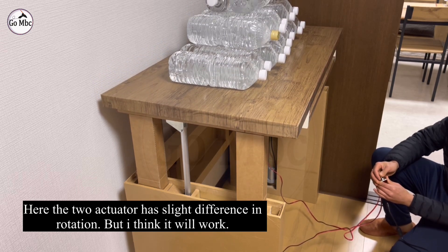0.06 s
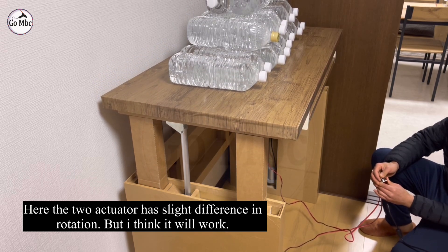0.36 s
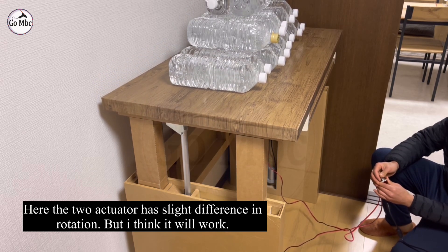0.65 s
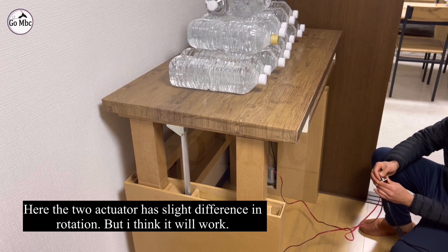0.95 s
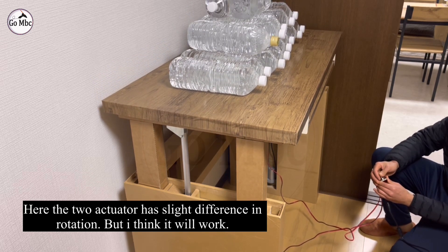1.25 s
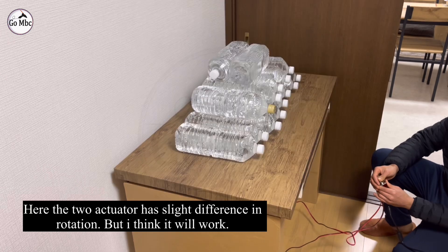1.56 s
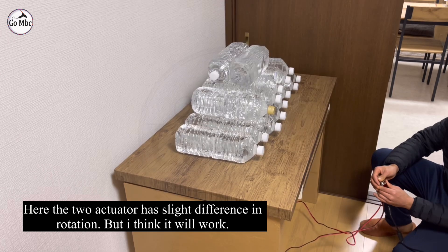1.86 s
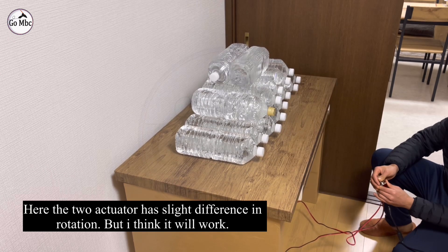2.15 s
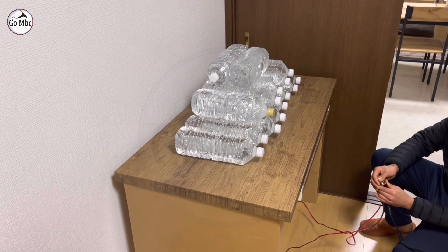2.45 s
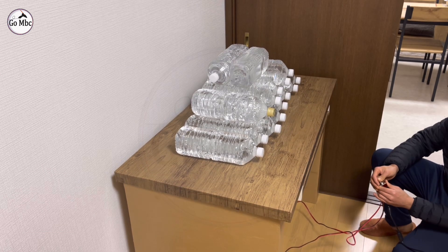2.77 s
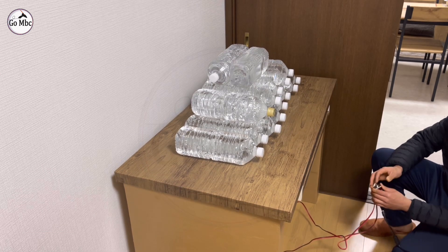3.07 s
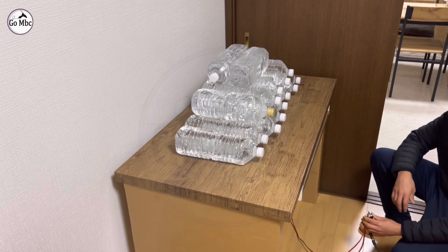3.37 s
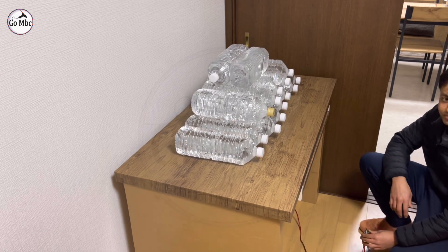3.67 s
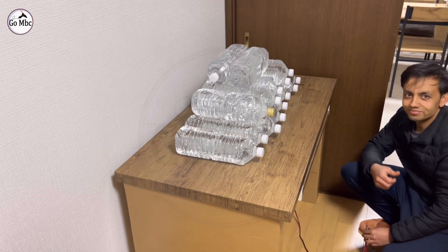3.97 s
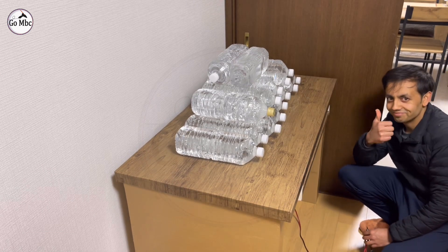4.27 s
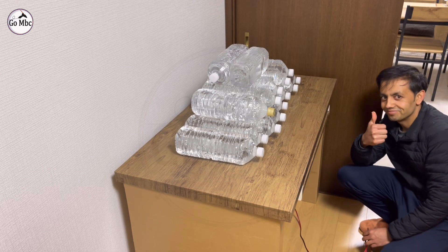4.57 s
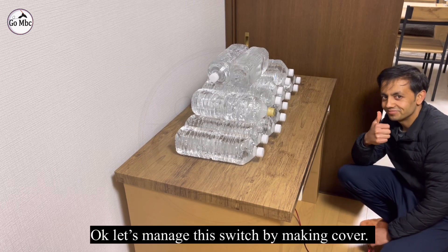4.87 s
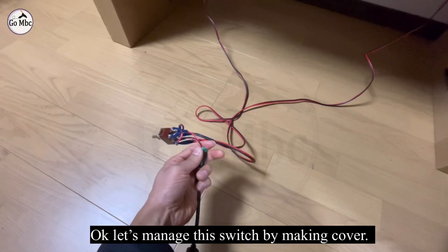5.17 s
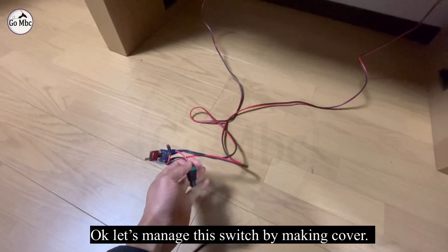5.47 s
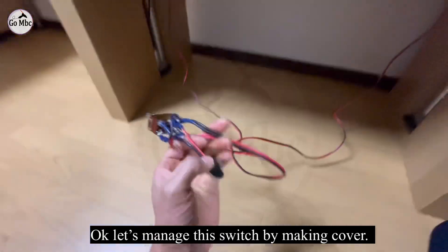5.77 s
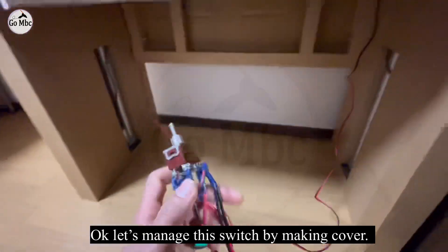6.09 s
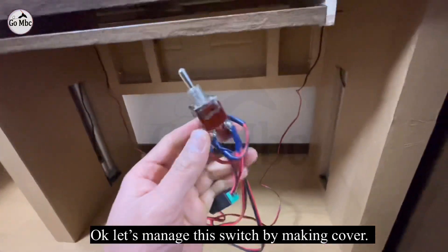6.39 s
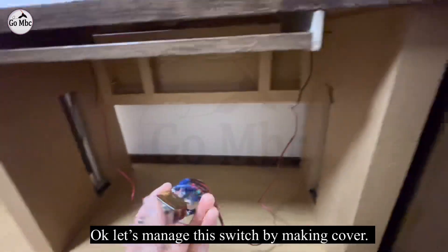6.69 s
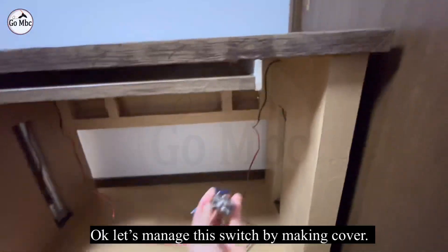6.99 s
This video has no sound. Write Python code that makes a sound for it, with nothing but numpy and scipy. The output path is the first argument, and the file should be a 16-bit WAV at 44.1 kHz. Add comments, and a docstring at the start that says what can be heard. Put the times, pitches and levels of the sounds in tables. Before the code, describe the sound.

In a small room, two geared motors whine and grind at slightly different speeds as they lower a wooden desk, then stop one after the other with a soft thud. Clothes rustle faintly and a wired switch clicks onto the floor. Then, close to the microphone and over a low hum, the toggle switch is handled with faint squeaks, snaps sharply twice and knocks lightly a few times.

```python
"""Two geared motors whine and grind as their screws lower a loaded wooden desk in a small room. They turn
at slightly different speeds, heard from low down and then from above, and stop one after the other.
Clothes rustle and a wired toggle switch is put on the floor. Then, close up and over a low hum, the
switch squeaks in the hand and snaps twice as its contacts strike.
The sound fades out and in briefly three times."""
import sys
import numpy as np
from scipy import signal
from scipy.fft import rfft, irfft, next_fast_len
from scipy.io import wavfile

SR = 44100
rng = np.random.default_rng(int(sys.argv[2]) if len(sys.argv) > 2 else 0)


def master_out(mix):
    """Clip the mix to full scale and print it as 16-bit PCM to the path in sys.argv[1]."""
    frames = np.transpose(np.atleast_2d(mix))
    ceiling = np.clip(frames, -1, 1)
    pcm = np.round(ceiling * 32767).astype(np.int16)
    wavfile.write(sys.argv[1], SR, pcm)


N = 319098

# tone colour of each noise: (frequency [Hz], relative level [dB])
AIR_COLOUR = [(15, -51), (25, -42), (48, -8.5), (190, -6), (249, -14.5), (285, -2.5), (344, -8.5),
              (384, -10), (545, -12.5), (754, -18), (1480, -25), (2550, -36), (3160, -35.5), (3620, -47),
              (16000, -51)]   # the quiet room
RUSH_COLOUR = [(15, -69.5), (25, -48), (44, -28), (97, -12.5), (134, -7), (195, -21.5), (326, -18),
               (373, -17), (624, -24.5), (863, -25), (988, -27), (2220, -33), (4610, -41), (14400, -39.5),
               (16000, -43)]   # the rush close to the desk
SLEEVE_FAR_COLOUR = [(300, -16), (900, 3), (2000, 0), (3100, 4), (5000, -0.5), (9000, -3.5), (12000, -0.5),
                     (15000, 5)]   # cloth across the room
SLEEVE_NEAR_COLOUR = [(300, -8.5), (900, -7.5), (2000, 4.5), (3500, -1.5), (6000, -1.5), (10000, -2.5),
                      (15000, -1.5)]   # cloth close by
CRACK_COLOUR = [(400, -18.5), (1400, 7.5), (2200, 4), (3200, -0.5), (4000, -7.5), (5000, 1), (6500, -6.5),
                (8700, -2.5), (11000, -6), (15500, -11.5)]   # the switch contacts
RUB_COLOUR = [(300, -21), (480, -8), (590, 5.5), (690, -11.5), (800, 4), (1000, -13), (1250, -9.5),
              (2000, -22), (3000, -24), (8000, -49)]   # the switch lever
GRIND_LOW_COLOUR = [(45, -50.5), (100, -8), (260, -7), (450, -1), (620, -1.5), (1000, 2.5), (1280, 1.5),
                    (1600, -11.5), (2300, -7), (3300, -11), (4500, -13), (7300, -21.5), (11000, -17.5),
                    (15500, -16)]   # gears sounding through the desk, from low down
GRIND_ABOVE_COLOUR = [(45, -47), (100, -7), (210, 0), (290, -8), (650, 1), (940, 3.5), (1300, -6),
                      (1700, -10), (2300, -8), (3300, -9), (4400, -13.5), (7300, -19.5), (11000, -18.5),
                      (15500, -17.5)]   # the same from above
# ringing peaks in the grind, with a bright lift near 14.7 kHz: (frequency [Hz], width [Hz], lift [dB])
GRIND_PEAKS = [(2364, 173, 11), (3895, 200, 4.5), (4950, 87, 5.5), (12580, 160, 13.5), (14600, 400, 5.5),
               (14700, 740, 11.5)]
# how alike left and right are: (frequency [Hz], likeness [0 to 1])
AIR_STEREO = [(60, 0.27), (130, 1), (290, .78), (640, .4), (1400, 0.082), (7000, .05), (15000, 0.71)]
MOTOR_STEREO = [(60, 1), (300, 1), (700, 0.81), (1300, 0.28), (2400, 0.26), (5000, 0.27), (15000, .7)]
# the room's echo; a decay time (t60) is the time to fall by 60 dB: (frequency [Hz], decay [s])
ECHO_DECAY = [(150, 0.3), (600, 0.18), (1500, 0.13), (4000, 0.17), (15000, 0.079)]
# sliding sleeves and the rubbing lever: (start [s], length [s], level [dB])
SLEEVE_SLIDES = [(3.1, .18, -82), (3.41, 0.047, -71.5), (3.7, 0.2, -64.5), (4.09, 0.013, -62),
                 (5.16, 0.16, -59), (5.59, 0.064, -62), (5.89, 0.077, -51.5), (6.8, 0.14, -54.5),
                 (7.02, 0.25, -57)]
LEVER_SLIDES = [(5.447, 0.021, -34.5), (5.565, 0.091, -40.5)]
# skin on plastic: (start [s], length [s], level [dB], pitch [Hz])
SKIN_SQUEAKS = [(5.143, 0.43, -63, 1730), (5.77, 0.089, -62.5, 2120), (6.457, 0.19, -70, 2680)]
# thuds of the end stop, falling wire and hand: (time [s], level [dB], decay [s], pitch [Hz])
THUDS = [(2.327, -46.5, 0.36, 153), (4.184, -50, 0.061, 840), (5.030, -32.5, 0.071, 593),
         (6.30, -47, 0.077, 111), (6.335, -49, 0.12, 120), (6.426, -46, 0.083, 200)]
# knocks of switch and wires: (time [s], dull [dB], middle [dB], bright [dB], top [dB], decay [s])
LIGHT_KNOCKS = [(2.913, -92, -59.5, -83, -57.5, 0.12), (3.42, -62.5, -66, -74, -76, 0.069),
                (3.64, -61, -62, -66, -51, 0.082), (3.666, -59, -59, -59, -56, 0.077),
                (4.1375, -33.5, -29, -39.5, -25.5, 0.013), (5.031, -30, -26.5, -29.5, -43, 0.022),
                (5.245, -49, -44.5, -57, -66, 0.044), (5.2864, -58.5, -69, -42.5, -45, 0.03),
                (5.288, -55, -55, -33, -29, 0.068), (6.433, -45.5, -57, -47, -46, 0.011),
                (6.469, -69.5, -57, -61, -49, .02), (6.88, -48.5, -50.5, -47, -61, 0.13)]
# their dull, middle, bright and top ranges: (low edge [Hz], high edge before band() caps it [Hz])
KNOCK_BANDS = [(1000, 1610), (1700, 3750), (4500, 14200), (12000, 28000)]
# sharp hits within the two snaps, including a quick echo of the first:
# (time [s], knock [dB], crack [dB], crack decay [s])
SNAP_HITS = [(5.435, -8, -27.5, 0.019), (5.4373, -31.5, -28, 0.066), (5.459, -22, -45, 0.037),
             (5.6318, -21, -22.5, 0.043), (5.6399, -15.5, -21.5, 0.022), (5.6417, -18, -12, 0.0094),
             (5.6438, -32, -25, 0.14)]
# the notes that ring in switch and room after each snap: (pitch [Hz], relative level [dB], decay [s])
SNAP_NOTES = [(270.4, -7.5, 0.013), (410, -12, 0.032), (577, 0, 0.026), (835, -6, 0.049),
              (1250, -4, 0.0059), (1510, -6, 0.026), (1810, -2, 0.015), (2370, -25, 0.0068),
              (3200, -26, 0.017)]
# hum and rush sink at each snap: (time [s], added depth [dB])
HUM_DIPS = [(5.44, 7), (5.639, 7)]
# rotor and gear tones, relative levels: (pitch [times rotor speed], from low down [dB], from above [dB])
FAST_GEAR_TONES = [(2, -75, -56), (2.21, -75, -59), (6, -63, -58), (8.86, -58, -52), (11.4, -70, -46),
                   (12, -58, -61), (18, -63, -69), (23, -55, -55), (24, -51, -54), (25, -57, -58),
                   (26, -61, -67), (27, -67, -61), (29, -70, -59), (30, -59, -61), (34, -65, -71),
                   (35, -58, -61), (36, -49.5, -50.5), (37, -58, -58), (38, -68, -68), (47, -61, -69),
                   (48, -55, -62), (49, -64, -64), (121, -73, -76), (132, -60, -60), (133, -68, -73),
                   (143, -64, -63), (144, -54, -55), (145, -67, -69), (146, -76, -77), (148, -67, -78)]
SLOW_GEAR_TONES = [(3.95, -52.5, -65), (4.88, -58, -73), (6, -55.5, -61), (6.62, -71, -56),
                   (8.83, -55, -51), (9.4, -58, -52.5), (11, -60, -62), (12, -56, -57), (14, -60, -78),
                   (23, -66, -64), (24, -47, -52.5), (25, -69, -61), (32, -60, -75), (36, -62, -68),
                   (48, -67, -67), (49, -70, -77)]
# each rotor's run, heard from low down and then from above:
# (start [s], speed [turns/s], speed-up [turns/s per s], easiest moment [s], speed swing [share])
FAST_RUN = [(0, 104.42, .2, .16, .004), (1.51, 105.2, .64, 1.622, .0068)]
SLOW_RUN = [(0, 97.9, .49, .97, .0035), (1.51, 99.6, .9, 1.68, .004)]
# fades of the whole sound: (quietest moment [s], fade-out [s], fade-in [s])
BRIEF_FADES = [(1.51, 0.13, 0.14), (4.995, 0.13, 0.16), (6.645, 0.15, 0.135)]

ABOVE_FROM_S, CLOSE_FROM_S = 1.51, 5.0   # heard from above the desk, then close up


def from_db(db):
    """Turn decibels into a number to multiply by."""
    return 10 ** (np.asarray(db) / 20)


def rms_one(x):
    """Scale a signal so that its average strength (rms) is 1."""
    return x / np.sqrt(np.mean(x ** 2) + 1e-20)


def clock():
    """The time of every sample, in seconds."""
    return np.arange(N) / SR


def at_hz(points, hz):
    """Read between a table's rows, giving each octave equal room."""
    points = np.array(points)
    return np.interp(np.log(np.maximum(hz, 1)), np.log(points[:, 0]), points[:, 1])


def drift(rate, size=N):
    """A smooth random wobble of strength 1 that changes about rate times a second."""
    r = np.exp(-80 * np.pi * rate / SR)
    slow = signal.lfilter([1], [1, -2 * r, r * r], rng.standard_normal(size // 40 + 2002))[2000:]
    return np.interp(np.arange(size) / 40, np.arange(len(slow)), rms_one(slow))


def coloured(pair, colour, likeness, peaks=()):
    """Turn two signals into stereo of strength 1 with a tone colour, peaks and left-right likeness."""
    size = next_fast_len(N)
    hz = np.arange(size // 2 + 1) * SR / size
    peaks_db = sum(lift / (1 + (2 * (hz - centre) / width) ** 2) for centre, width, lift in peaks)
    alike = np.clip(at_hz(likeness, hz), -1, 1)
    mid, side = rfft(pair, size) * from_db(at_hz(colour, hz) + peaks_db) * hz / np.hypot(hz, 20)
    stereo = np.sqrt(1 + alike) * mid + np.sqrt(1 - alike) * side * [[1], [-1]]
    return rms_one(irfft(stereo, size)[:, :N])


def noise(colour, likeness=AIR_STEREO):
    """Steady stereo noise of strength 1."""
    return coloured(rng.standard_normal((2, N)), colour, likeness)


def band(x, low_hz, high_hz):
    """Keep the sound between two frequencies."""
    edges = [low_hz, min(high_hz, .45 * SR)]
    return signal.sosfilt(signal.butter(2, edges, "band", fs=SR, output="sos"), x)


def blows(times, dbs, t60s):
    """The loudness curve of sudden blows that each die away."""
    out, age = np.zeros(N), np.arange(SR // 4) / SR
    for s, db, t60 in zip(times, dbs, t60s):
        part = out[round(s * SR):][:len(age)]
        part += from_db(db - 60 * age / t60)[:len(part)]
    return out


def strokes(rows, rise_s, fall_s):
    """The loudness curve of slides: each swells 20 dB per rise_s, holds, then drops 20 dB per fall_s."""
    t = clock()
    levels = [db - 20 * np.maximum(np.maximum((start - t) / rise_s, (t - start - length) / fall_s), 0)
              for start, length, db in rows]
    return from_db(np.maximum(np.max(levels, axis=0), -200))


def ring(times, dbs, hz, t60):
    """Each blow starts a pure note that dies away."""
    clicks = np.zeros(N)
    clicks[np.round(np.asarray(times) * SR).astype(int)] = from_db(dbs)
    r, w = np.exp(-np.log(1000) / (t60 * SR)), 2 * np.pi * hz / SR
    return signal.lfilter([0, np.sin(w)], [1, -2 * r * np.cos(w), r * r], clicks + 1e-18)


def panned(x, left_db):
    """Make the left side louder than the right by left_db."""
    return x * from_db([[left_db / 2], [-left_db / 2]])


def room(x, echo_db):
    """Add the dense echoes of a small room; the treble dies first."""
    age, edges = np.arange(SR // 2) / SR, np.geomspace(120, 16000, 8)
    tail = sum(band(rng.standard_normal((2, len(age))), low, high)
               * from_db(-60 * age / at_hz(ECHO_DECAY, np.sqrt(low * high)))
               for low, high in zip(edges, edges[1:]))
    tail *= np.clip(age / 0.0024, 0, 1)
    tail /= np.sqrt(np.sum(tail ** 2) / 2)
    return x + from_db(echo_db) * signal.fftconvolve(x, tail, axes=1)[:, :N]


def background(hum_hz=136.9, recovery_db_per_s=5, restored_s=6.64):
    """Faint room air; close to the desk, a wavering hum and a louder rush that dip after the snaps."""
    t = clock()
    sunk_db = sum(depth_db * np.clip((t - s) / 0.032, 0, 1) for s, depth_db in HUM_DIPS)
    sunk_db -= recovery_db_per_s * np.maximum(t - HUM_DIPS[0][0], 0)
    dip = from_db(-np.maximum(sunk_db, 0) * (t < restored_s))
    hum = np.sqrt(2) * np.sin(2 * np.pi * hum_hz * t + 0.11 * drift(21)) * from_db(-44 - 2.1 * drift(12))
    rush = from_db(-46) * noise(RUSH_COLOUR)
    close = panned(hum, left_db=1.6) + panned(rush, left_db=1.0)
    return np.where(t > CLOSE_FROM_S, dip * close, from_db(-63) * noise(AIR_COLOUR))


def sleeves(crackles_per_s=60, crackle_db=-7):
    """Cloth slides with a fine, uneven hiss; close by, the wires crackle against it."""
    clicks = (rng.random(N) < crackles_per_s / SR) * np.minimum(rng.exponential(1, N), 3)
    grain = rng.standard_normal(SR // 400) * np.linspace(1, 0, SR // 400) ** 2
    crackles = from_db(crackle_db) * rms_one(signal.fftconvolve(clicks, grain)[:N])
    near = coloured(rng.standard_normal((2, N)) + crackles * [[1], [.5]], SLEEVE_NEAR_COLOUR, AIR_STEREO)
    hiss = np.where(clock() > CLOSE_FROM_S, near, noise(SLEEVE_FAR_COLOUR, MOTOR_STEREO))
    return strokes(SLEEVE_SLIDES, rise_s=.16, fall_s=.18) * from_db(drift(50)) * hiss


def squeaks(width_ratio=1.11):
    """Skin slips over the plastic and makes it rasp faintly around one pitch."""
    out = np.zeros((2, N))
    for start, length, db, hz in SKIN_SQUEAKS:
        friction = rng.standard_normal(N) + rng.standard_normal((2, N))
        rasp = rms_one(band(friction, hz / width_ratio, hz * width_ratio))
        out += strokes([(start, length, db)], rise_s=.08, fall_s=.1) * rasp
    return out


def soft_bumps():
    """The end stop, the falling wire and the hand make dull thuds, alike on both sides."""
    white, out = rng.standard_normal(N), np.zeros(N)
    for s, db, t60, hz in THUDS:
        rumble = rms_one(band(white, hz / 2, hz * 2))
        out += band(blows([s], [db], [t60]) * rumble, hz / 2, hz * 2)
    return out


def light_knocks(low_cut_hz=850):
    """Switch and wires knock in short bursts of noise; such small parts give off no bass."""
    times, *levels, t60s = np.transpose(LIGHT_KNOCKS)
    bursts = np.zeros((2, N))
    for dbs, (low, high) in zip(levels, KNOCK_BANDS):
        white = rng.standard_normal(N) + 2.1 * rng.standard_normal((2, N))
        bursts += blows(times, dbs, t60s) * rms_one(band(white, low, high))
    bursts = signal.sosfilt(signal.butter(4, low_cut_hz, "high", fs=SR, output="sos"), bursts)
    return room(panned(bursts, left_db=1.5), echo_db=-15.5)


def switch(late_cycles=0.73, right_delay_s=.00027):
    """The lever rubs, each snap cracks and sets switch and room ringing, and the spring pings once."""
    times, knock_db, crack_db, t60s = np.transpose(SNAP_HITS)
    # low notes travel more slowly and start later, so each knock sweeps quickly downwards
    notes = sum(ring(times + late_cycles / hz, knock_db + db + rng.normal(0, 1, len(times)), hz, t60)
                for hz, db, t60 in SNAP_NOTES)
    notes = band(notes, low_hz=220, high_hz=9000)
    crack = blows(times, crack_db, t60s) * noise(CRACK_COLOUR, likeness=[(300, 0.3), (15000, 0.25)])
    ping = ring(times=[5.646], dbs=[-19.5], hz=8700, t60=.02)
    left, right = panned(notes, left_db=5.0) + panned(crack, left_db=3.0) + panned(ping, left_db=16)
    direct = np.array([left, np.interp(clock() - right_delay_s, clock(), right)])
    snaps = room(direct, echo_db=-17)
    return snaps + strokes(LEVER_SLIDES, rise_s=.03, fall_s=.069) * noise(RUB_COLOUR, MOTOR_STEREO)


def rotor_speed(run, turns_per_screw_turn=20.4):
    """The rotor slowly speeds up; the screw runs easy (ease 1) and hard (-1) once per screw turn."""
    t, speed, ease = clock(), np.zeros(N), np.zeros(N)
    for start_s, turns_per_s, speed_up, easiest_s, swing in run:
        screw_turns = (t - easiest_s) * turns_per_s / turns_per_screw_turn
        ease = np.where(t >= start_s, np.cos(2 * np.pi * screw_turns), ease)
        rising_speed = turns_per_s + speed_up * (t - start_s)
        speed = np.where(t >= start_s, rising_speed * (1 + swing * ease), speed)
    return speed, ease


def gear_whine(tones, turns, ease, running, whine_db, brush_db=5.5, flutter_db=1.8):
    """Tones that follow the rotor while it is running; the highest are the brushes squealing."""
    above = clock()[:running] > ABOVE_FROM_S
    whine = np.zeros((2, N))
    for multiple, db_low, db_above in tones:
        # high tones reach the two sides out of step
        apart = min(multiple / 22, 1) * .5 * rng.choice([-1, 1])
        wander, flutter = drift(6.1, size=3 * SR)[:running], drift(19.0, size=3 * SR)[:running]
        angle = 2 * np.pi * (multiple * turns[:running] + rng.random()) + 0.38 * wander
        # uneven meshing makes each tone flutter; high ones swell 1 dB when the screw runs easy
        waver_db = flutter_db * flutter + min(multiple / 36, 1) * ease[:running]
        level_db = np.where(above, db_above, db_low) + whine_db + brush_db * (multiple > 100) + waver_db
        whine[:, :running] += np.sqrt(2) * from_db(level_db) * np.sin(angle + [[apart], [-apart]])
    return whine


def gear_grind(turns, braking, low_db, above_db, buzz, chop, chops_per_turn=6):
    """The same surface bumps buzz past on every turn, mixed with fresh friction; the teeth chop both."""
    places = np.linspace(0, 1, 400, endpoint=False)
    bumps = np.array([np.interp(turns, places, side, period=1) for side in rng.standard_normal((2, 400))])
    friction = buzz * rms_one(bumps * braking) + rng.standard_normal((2, N))
    teeth = 1 + chop * np.cos(2 * np.pi * chops_per_turn * turns) + 0.094 * np.cos(2 * np.pi * turns)
    rub = friction * teeth * from_db(drift(28)) * (braking > 0)
    above = from_db(above_db) * coloured(rub, GRIND_ABOVE_COLOUR, MOTOR_STEREO, GRIND_PEAKS)
    low = from_db(low_db) * coloured(rub, GRIND_LOW_COLOUR, MOTOR_STEREO, GRIND_PEAKS)
    return np.where(clock() > ABOVE_FROM_S, above, low)


def motor(run, tones, stop_s, whine_db, swell_db_per_s, jitter, coast_s=.12, **grind_settings):
    """A geared motor runs, then coasts to rest: the whine dies first, the gears grind a little longer."""
    since_stop = np.maximum(clock() - stop_s, 0)
    coasted = since_stop / coast_s
    braking = 1 - np.minimum(coasted, 1) ** 2
    speed, ease = rotor_speed(run)
    turns = np.cumsum(speed * braking * (1 + jitter * drift(35))) / SR
    whine = gear_whine(tones, turns, ease, np.count_nonzero(braking), whine_db)
    grind = gear_grind(turns, braking, **grind_settings)
    # heard from low down, the level creeps up as the desk sinks
    swell_db = swell_db_per_s * np.minimum(clock() - ABOVE_FROM_S, 0)
    coast_db = -49 * np.minimum(coasted, 2) ** 2
    return from_db(swell_db + coast_db) * (whine * from_db(-200 * since_stop) + grind)


def desk_motors():
    """Two motors lower the desk; the faster one reaches its end stop first."""
    fast = motor(FAST_RUN, FAST_GEAR_TONES, stop_s=2.348, whine_db=-1.36, swell_db_per_s=0.65,
                 jitter=0.0013, low_db=-47, above_db=-47.5, buzz=0.31, chop=0.16)
    slow = motor(SLOW_RUN, SLOW_GEAR_TONES, stop_s=2.45, whine_db=-0.03, swell_db_per_s=0.2,
                 jitter=0.00196, low_db=-48, above_db=-51, buzz=0.16, chop=0.3)
    left, right = fast + slow
    # the treble is stronger on the left, beside the wall
    return np.array([left + 0.42 * band(left, low_hz=2240, high_hz=9900), 0.88 * right])


def scene():
    """Add all the sounds together."""
    return desk_motors() + background() + sleeves() + squeaks() + light_knocks() + soft_bumps() + switch()


def record(dry, low_cut_hz=42, high_cut_hz=15900, gap_s=0.022, fade_power=1.17):
    """The microphone drops the deepest bass; the sound fades three times and loses its top treble."""
    t = clock()
    sound = signal.sosfilt(signal.butter(3, low_cut_hz, "high", fs=SR, output="sos"), dry)
    for silent_s, out_s, in_s in BRIEF_FADES:
        fade_out = (silent_s - gap_s / 2 - t) / out_s
        fade_in = (t - silent_s - gap_s / 2) / in_s
        sound *= np.clip(np.maximum(fade_out, fade_in), .001, 1) ** fade_power
    return signal.sosfilt(signal.ellip(10, .1, 80, high_cut_hz, fs=SR, output="sos"), sound)


dry = scene()
out = record(dry)
master_out(out)
```